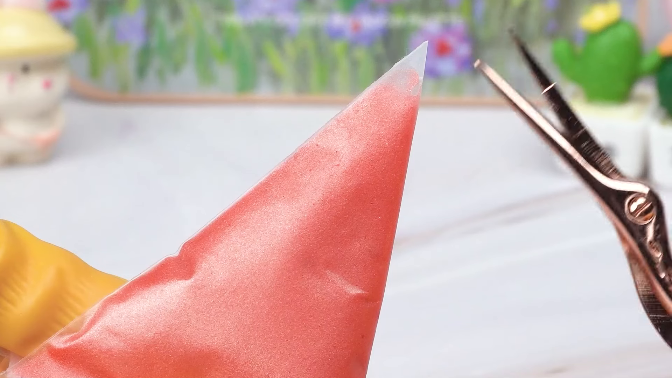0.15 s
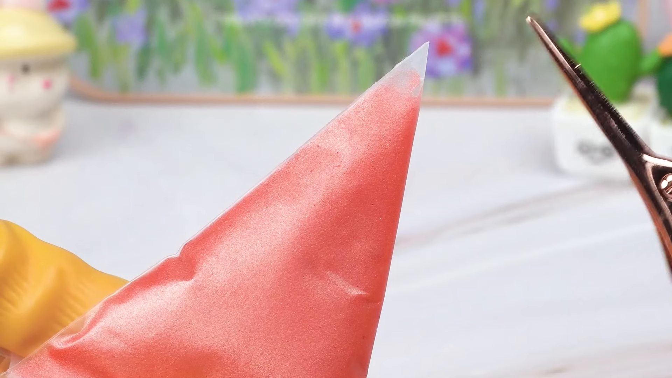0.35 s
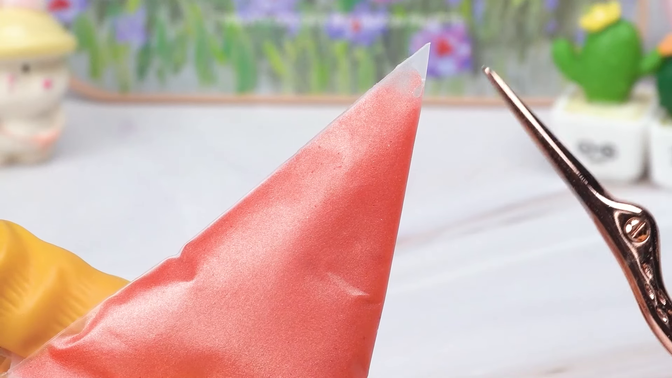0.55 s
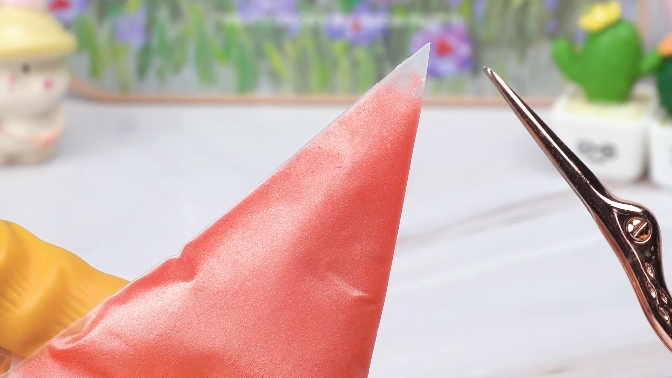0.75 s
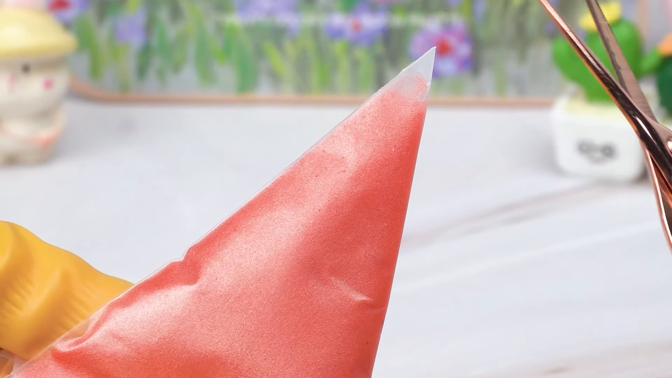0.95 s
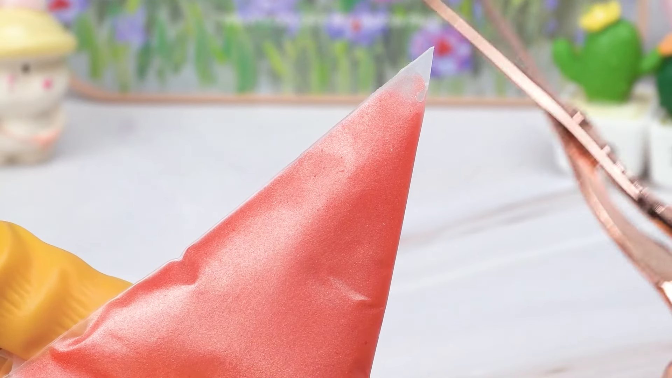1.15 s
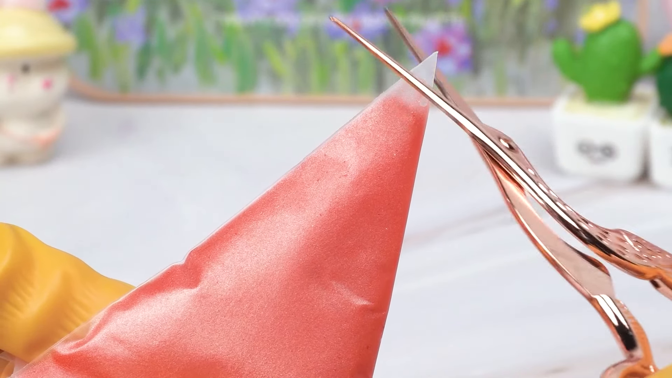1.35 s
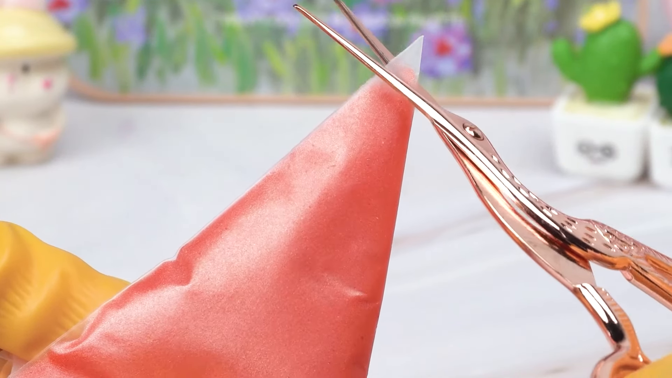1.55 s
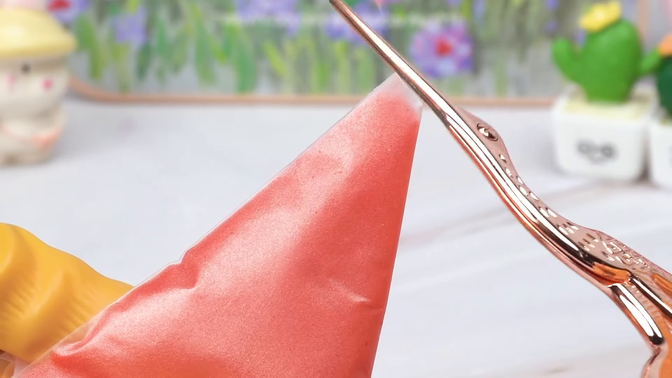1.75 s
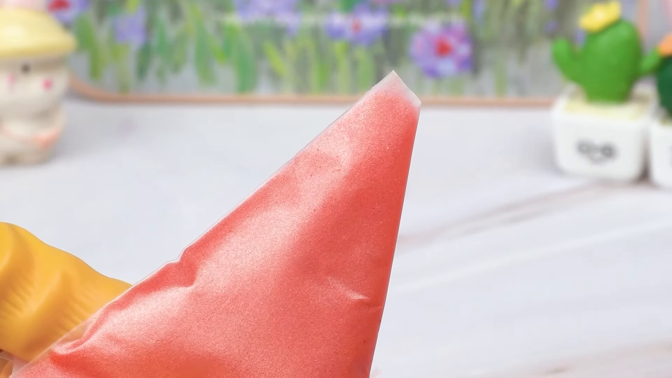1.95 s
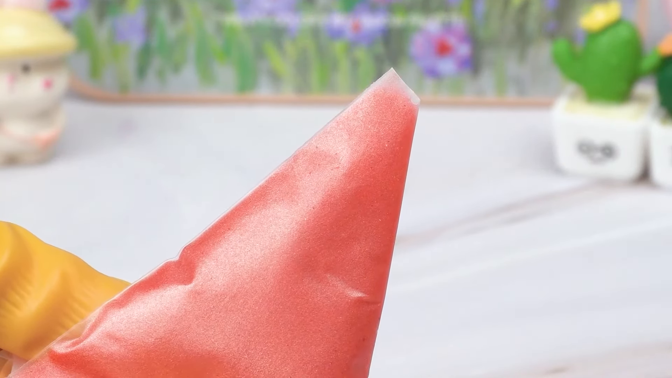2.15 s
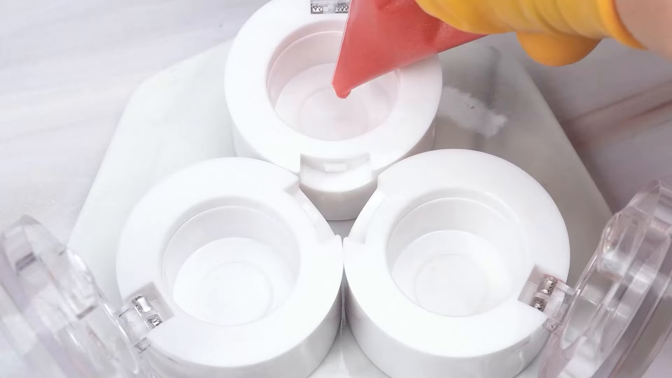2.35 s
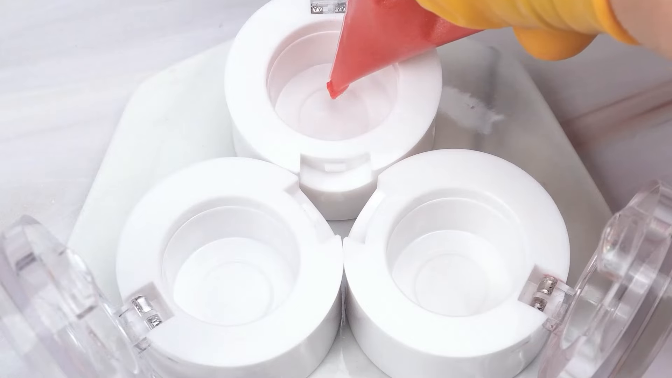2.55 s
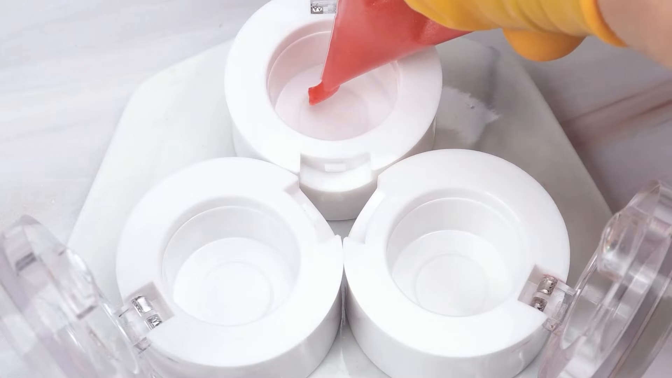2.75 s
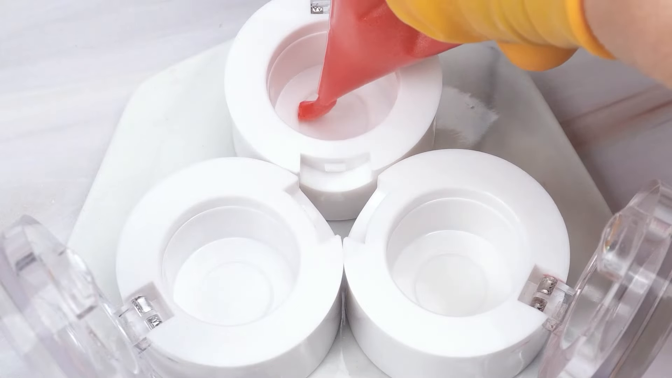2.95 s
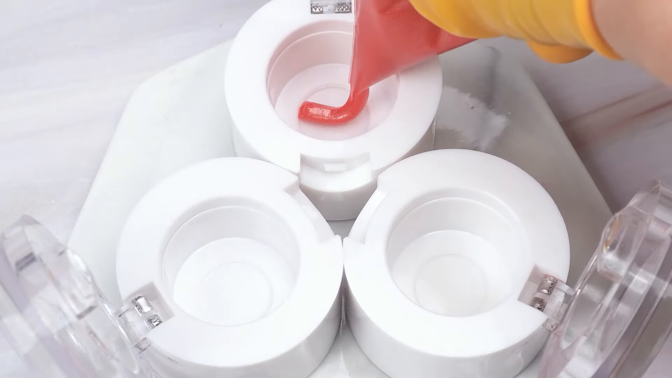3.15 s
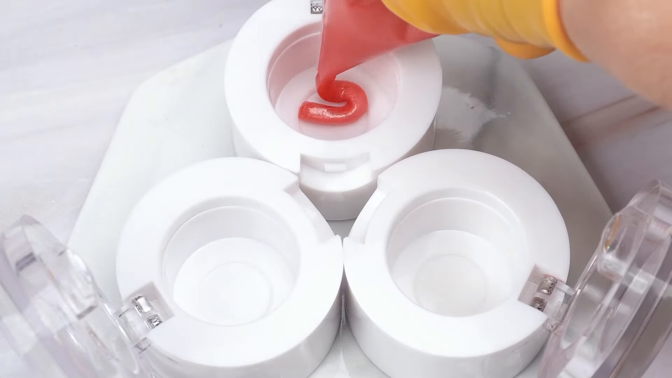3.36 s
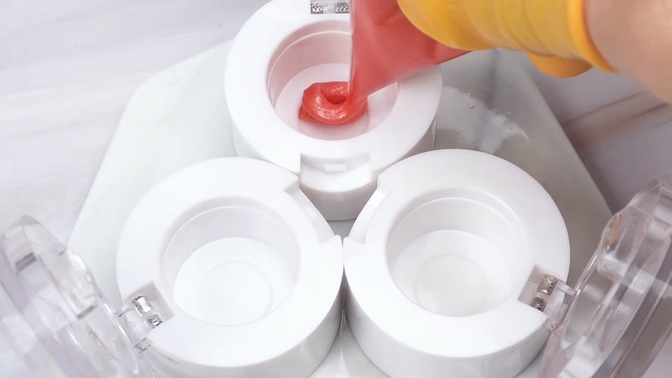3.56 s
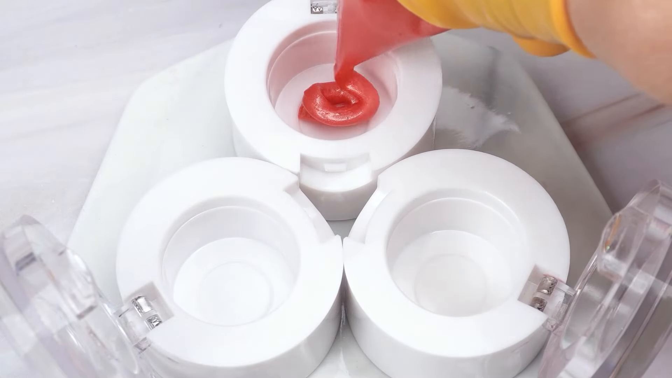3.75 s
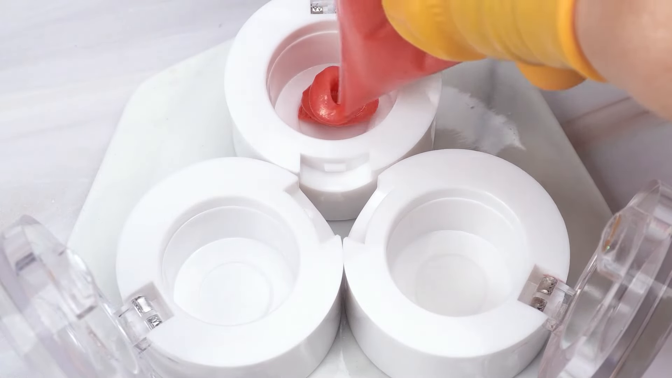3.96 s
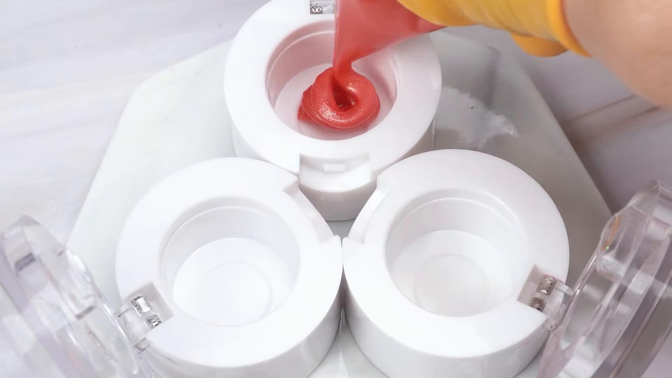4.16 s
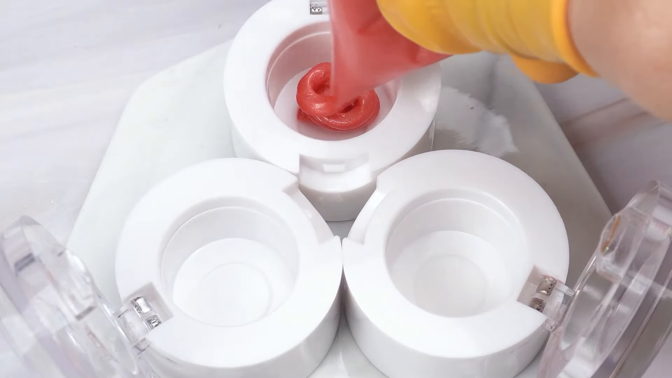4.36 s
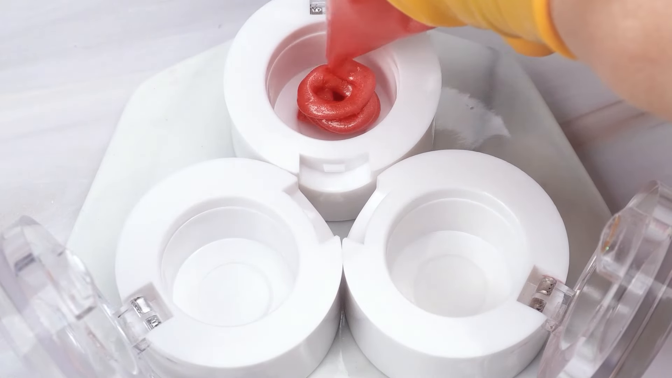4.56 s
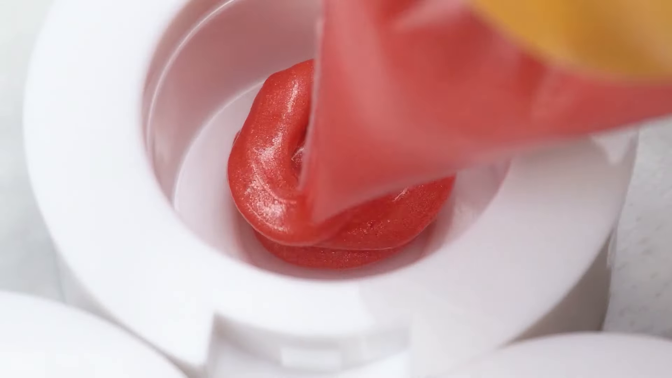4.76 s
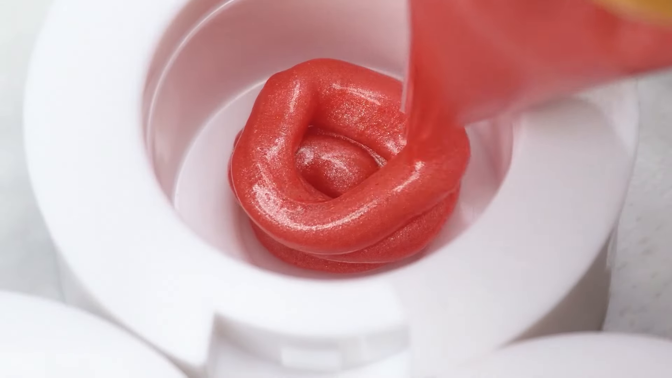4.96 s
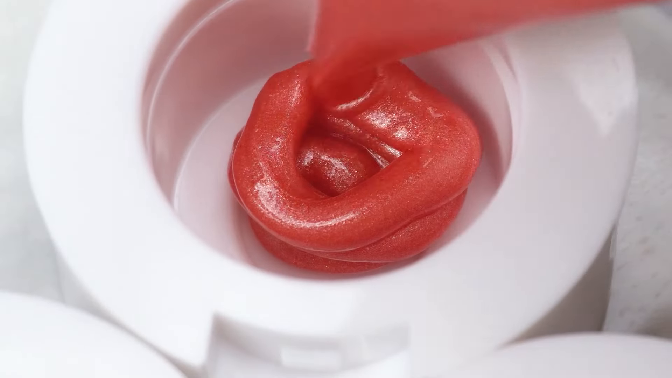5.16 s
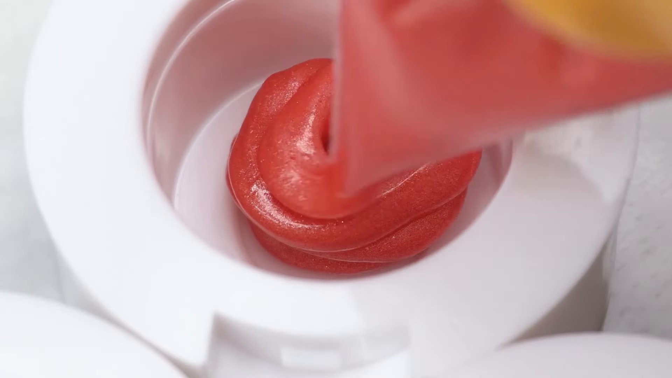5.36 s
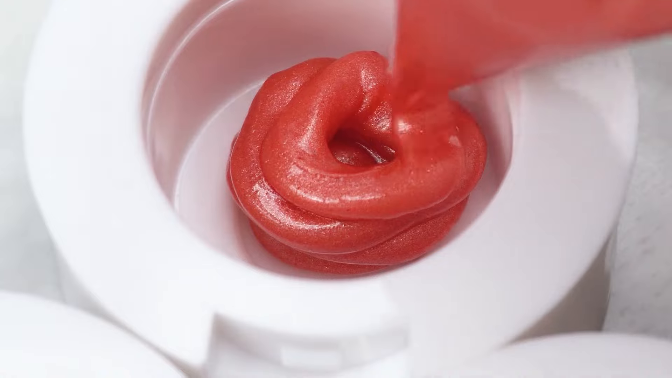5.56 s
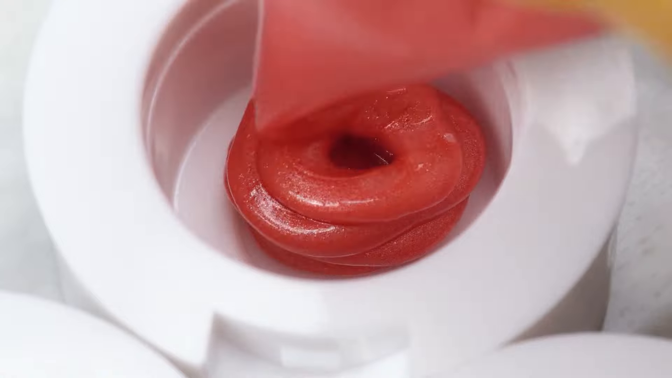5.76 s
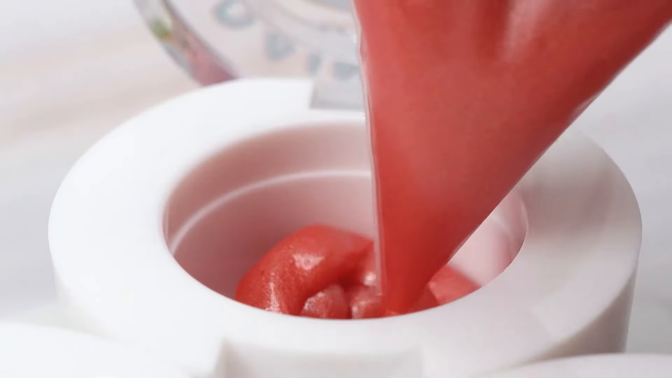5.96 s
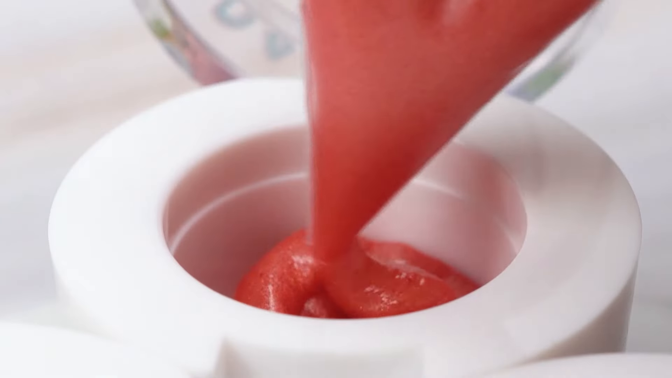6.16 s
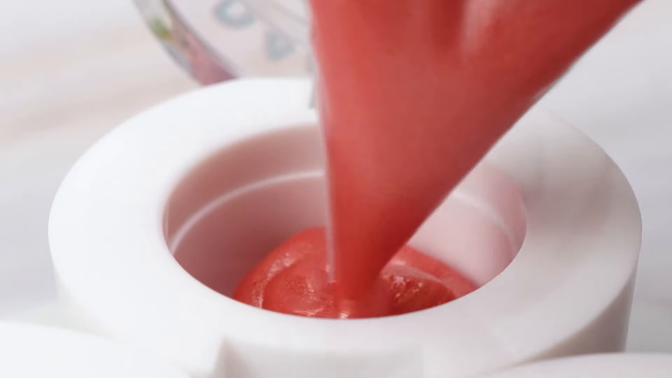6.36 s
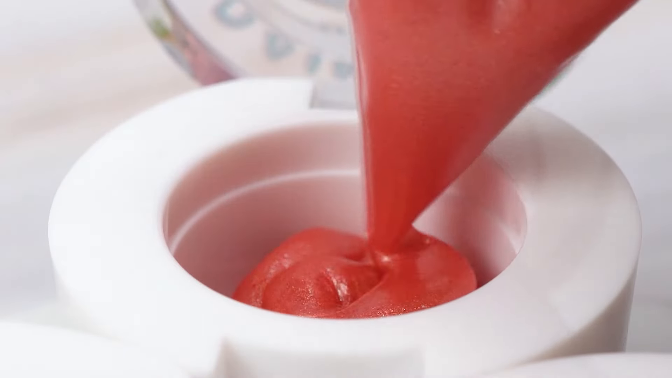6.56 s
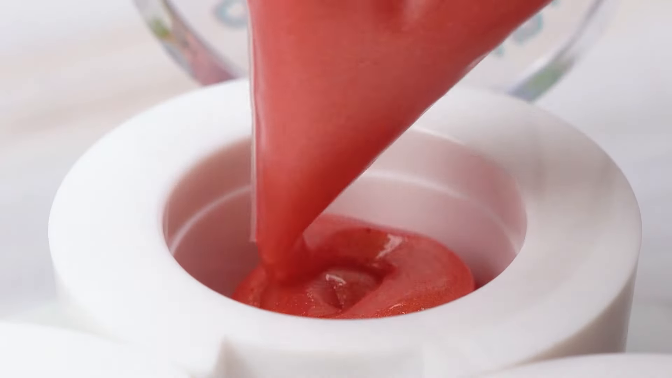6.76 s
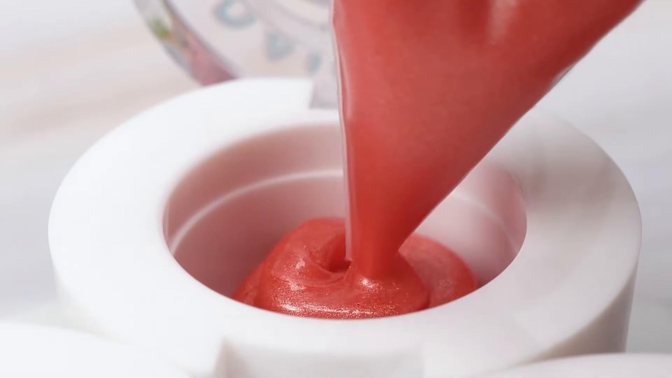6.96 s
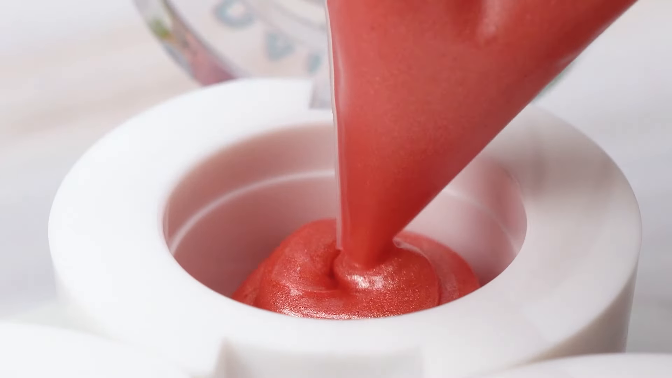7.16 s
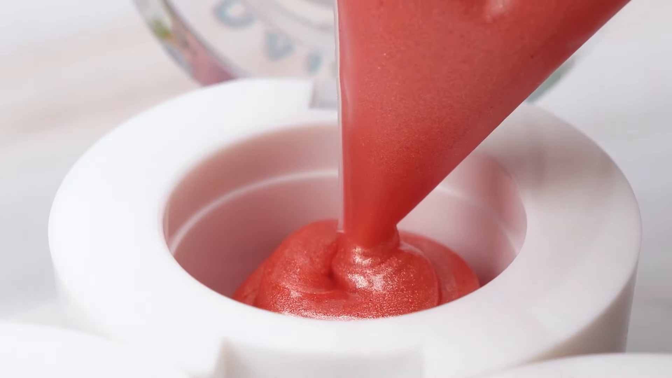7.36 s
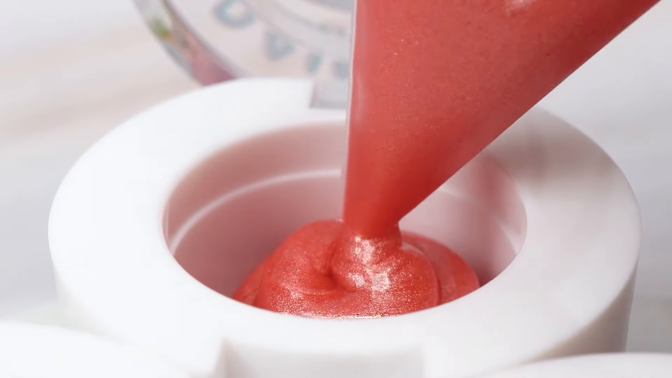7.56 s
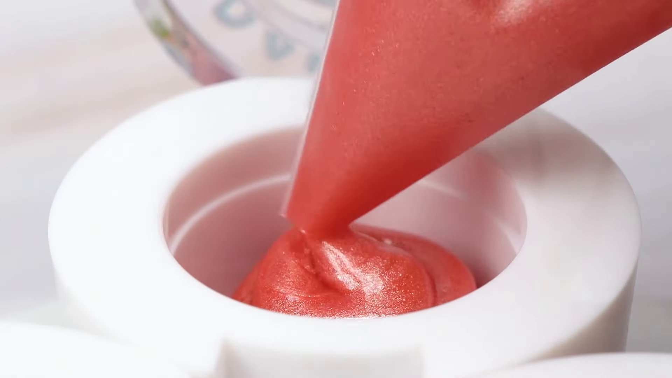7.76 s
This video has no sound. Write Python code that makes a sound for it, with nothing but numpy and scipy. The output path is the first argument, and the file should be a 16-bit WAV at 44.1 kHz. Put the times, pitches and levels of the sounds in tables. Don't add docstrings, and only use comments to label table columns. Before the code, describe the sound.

In a quiet room with faint hum and hiss, small steel scissors snap shut three times, bright and metallic. A faint high squeak follows, then a snip through plastic film, a closing snap, and a hard tick as the tip bounces on the table. After a pause, a filled plastic bag is squeezed, crackling densely, then more sparsely. Close stereo microphones hear the scissors wide and the bag centred.

```python
import sys
import numpy as np
from scipy import signal
from scipy.fft import rfft, irfft
from scipy.io import wavfile
from scipy.ndimage import uniform_filter1d

SR = 44100
rng = np.random.default_rng(int(sys.argv[2]) if len(sys.argv) > 2 else 0)


def dump(signal):
    limited = np.clip(np.atleast_2d(signal).T, -1, 1)
    pcm = np.round(limited * 32767).astype(np.int16)
    wavfile.write(sys.argv[1], SR, pcm)


def to_linear_factor(level_db):
    exponent = np.asarray(level_db, float) / 20
    return 10 ** exponent


N = 344421


def curve(rows, column=1, outside=None):
    rows = np.array(rows)
    return np.interp(np.arange(N) / SR, rows[:, 0], rows[:, column], outside, outside)


def unit(x):
    return x / np.sqrt(np.mean(x ** 2))


def band(x, lo_hz, hi_hz, order=2):
    sos = signal.butter(order, [lo_hz, min(hi_hz, .45 * SR)], "band", fs=SR, output="sos")
    return signal.sosfilt(sos, x)


def body(x, modes):
    out = 0
    for k, (hz, width_hz, db) in enumerate(modes):
        out = out + (-1) ** k * to_linear_factor(db) * signal.lfilter(*signal.iirpeak(hz, hz / width_hz, SR), x)
    return out


def bell(x, hz, q):
    b, a = signal.iirpeak(min(hz, .4 * SR), q, SR)
    return signal.lfilter(b, a, signal.lfilter(b, a, x))


def add(out, s, sound):
    i = int(s * SR)
    out[i:i + len(sound)] += sound[:N - i]


def echoes(x, t60, db, top_hz, gap=0.0022):
    t = np.arange(int(.25 * SR)) / SR
    tail = rng.standard_normal(len(t)) * to_linear_factor(-60 * t / t60) * (t > gap)
    tail = signal.lfilter(*signal.butter(1, top_hz, fs=SR), tail)
    return to_linear_factor(db) * signal.fftconvolve(x, tail / np.linalg.norm(tail))[:N]


# frequency in Hz, density in dB per Hz.
ROOM_COLOUR = [(25, -25), (53, -12), (70, -31.5), (94, -8.5), (134, -4.5), (190, -5.5), (293, -11.5),
               (344, -7.5), (591, -13), (775, -15), (1050, -17.5), (1750, -33.5), (16000, -38.5)]


def room_tone():
    hz, db = np.transpose(ROOM_COLOUR)
    colour = to_linear_factor(np.interp(np.log(np.fft.rfftfreq(N, 1 / SR) + 1), np.log(hz), db))
    return unit(irfft(rfft(rng.standard_normal(N)) * colour, N)) * to_linear_factor(-65)


# start in seconds, end in seconds.
WIDE_SPANS = [
    (-1, .8),
    (1.76, 2.19),
]


def room_width():
    side, t = room_tone(), np.arange(N) / SR
    side = to_linear_factor(-6.5) * side + 0.31 * band(side, 1250, 15200)
    is_wide = uniform_filter1d(1. * sum((t > start) & (t < end) for start, end in WIDE_SPANS), size=2000)
    side = side * is_wide + to_linear_factor(-18.5) * band(side, 4500, 13000)
    return side * np.array([[1], [-1]])


# time in seconds, level in dB.
HANDLING = [
    (2.4, -101),
    (3.42, -66.5),
    (6.51, -75.5),
    (6.63, -67),
    (7.81, -69),
]


def handling_rumble():
    return unit(band(rng.standard_normal(N), 11, 59.6)) * to_linear_factor(curve(HANDLING, outside=-200))


# time in seconds, pitch in Hz, level in dB.
SQUEAKS = [
    [(1.24, 13096, -76), (1.26, 13800, -88), (1.43, 12000, -92)],
    [(1.24, 11190, -97), (1.292, 11800, -79), (1.37, 11248, -88)],
]


def squeak():
    out = 0
    for rows in SQUEAKS:
        waver = unit(uniform_filter1d(rng.standard_normal(N), size=300))
        phase = 2 * np.pi * np.cumsum(curve(rows) + 30 * waver) / SR
        level_db = curve(rows, column=2, outside=-200) + 2.0 * waver
        out = out + np.sqrt(2) * to_linear_factor(level_db) * np.sin(phase)
    return out


RIGHT_LAG_S = .0025

# time in seconds, peak in dB.
BOUNCES = [
    (1.9727, -30),
    (2.0236, -49),
    (2.056, -48),
    (2.082, -60),
    (2.119, -57),
]
# frequency in Hz, width in Hz, level in dB.
TABLE_MODES = [(2240, 260, -1), (2730, 470, -2), (3160, 550, -4.5), (4680, 730, -9), (6600, 1060, -2),
               (10200, 4300, -5)]


def bounces():
    out, t = np.zeros((2, N)), np.arange(900) / SR
    for s, db in BOUNCES:
        near_top_hz = 13000 * to_linear_factor(0.36 * (db + 24.5))
        for side, lag_s, top_hz in ((0, 0.00017, near_top_hz), (1, RIGHT_LAG_S, 5500)):
            force = (t == 0) + 0.095 * rng.standard_normal(len(t)) * np.exp(-t / 0.0039)
            ring = band(body(force, TABLE_MODES), 1870, top_hz, order=3)
            add(out[side], s + 0.00087 + lag_s, ring / np.abs(ring).max() * to_linear_factor(db + 9.5))
    return out


# time in seconds, level in dB, scrape before the stop in dB,
# handle clack in dB, tip ring in dB.
SNAPS = [
    (0.0751, -18, 4.5, -9.5, 2),
    (0.3196, -19.5, -10.5, -10, 5),
    (0.5973, -21, -5, -10.5, 10.5),
    (1.821, -19, -9, -13.5, 6),
]
# frequency in Hz, width in Hz, level in dB.
BLADE_MODES = [(2200, 400, -12), (3120, 720, -14.5), (4600, 440, -15), (5010, 790, -12), (7050, 300, 2),
               (9800, 507, -6.5), (10740, 400, -3.5), (11600, 820, -5), (13500, 420, -2),
               (15500, 880, -1.5)]


def snaps():
    out, t = np.zeros((2, N)), np.arange(-240, 1600) / SR
    # side, lag s, scrape lead dB, rebound dB, tip facing dB; the tips point at the right one
    ears = (0, 0.00018, -15, -8, -5.5), (1, RIGHT_LAG_S, -5, -14, 4.5)
    for s, db, scrape_db, clack_db, tip_db in SNAPS:
        modes = []
        for hz, width_hz, mode_db in BLADE_MODES:
            grip_db = 2 * rng.standard_normal()
            modes.append((hz, width_hz, mode_db + grip_db + (clack_db + 11) * (hz < 6000)))
        for side, lag_s, lead_db, rebound_db, facing_db in ears:
            scrape = to_linear_factor(scrape_db + lead_db) * np.exp(np.minimum(t, 0) / .0025)
            stop = np.exp(-np.maximum(t, 0) / 0.00076)
            rebound = to_linear_factor(rebound_db) * np.exp(-((t - .004) / .0015) ** 2)
            chatter = to_linear_factor(-20) * (t > 0) * np.exp(-np.abs(t) / .007)
            force = np.where(t < 0, scrape, stop) + rebound + chatter
            push = force * rng.standard_normal(len(t)) + 7.2 * (t == 0)
            tip = (15100, 470, tip_db + facing_db)
            ring = unit(body(push, modes + [tip]))
            ring = ring + to_linear_factor(clack_db) * unit(band(push, 1330, 19700))
            pan_db = -5.5 * (.5 - side)
            add(out[side], s + lag_s + t[0], band(ring, 2050, 17000, order=6) * to_linear_factor(db - 13.5 + pan_db))
    return out


def scissors():
    steel = snaps() + bounces()
    steel = steel + np.array([echoes(channel, 0.12, -15.0, 3644, gap=0.00097) for channel in steel])
    return steel - 0.15 * steel[::-1]


# time in seconds, level in dB.
EFFORT = [
    [(1.46, -77), (1.572, -74), (1.582, -49.5), (1.632, -54.5), (1.655, -66.5), (1.7, -78)],
    [(2.48, -77), (2.7, -65.5), (2.8, -60.5), (3.1, -63), (3.22, -52.5), (3.28, -71), (3.4, -59), (3.8, -63), (3.95, -57.5), (4.05, -64.5), (4.39, -58), (4.45, -63), (4.6, -60), (4.78, -56.5), (4.98, -67.5), (5.15, -61.5), (5.28, -71), (6.62, -69.5)],
]
# time in seconds, rustle tilt in dB per octave, level over 10 kHz in dB.
FILM_TONE = [
    (1.4, 0, 4),
    (2.4, 8.5, -4),
    (3.0, -4, 6.5),
    (3.4, 0.5, 0.5),
    (5.0, 1, -0.5),
    (6.7, 0, -5),
]


def rustle(big, per_s=1300, spread_db=5.0):
    out, t = 0, np.arange(130) / SR
    level_db = np.maximum(*(curve(rows, outside=-200) for rows in EFFORT))
    for octave in np.arange(-2, 2.5):
        size_db = np.minimum(spread_db * rng.exponential(size=N), 8)
        ticks = (rng.random(N) < per_s / 5 / SR) * to_linear_factor(size_db)
        bursts = signal.fftconvolve(ticks, np.exp(-t / 0.00078))[:N] * rng.standard_normal(N)
        edges = 3000 * 2 ** (octave - .55), 3000 * 2 ** (octave + 0.5)
        rub = unit(band(rng.standard_normal(N), *edges))
        small = unit(band(bursts, *edges)) + to_linear_factor(-7.0) * rub
        keep = np.exp(-2 ** (.5 * octave) / (.005 * SR))
        power = np.abs(uniform_filter1d(band(big, *edges) ** 2, size=260))
        settle = np.sqrt(signal.lfilter([1 - keep], [1, -keep], power))
        effort = to_linear_factor(level_db - 11.0 + curve(FILM_TONE) * octave - 1.67 * abs(octave + .5))
        out = out + small * (effort + to_linear_factor(-13.5 - 0.5 * octave) * settle)
    return out


def tone_treble(bag):
    sos = signal.butter(4, 10000, "high", fs=SR, output="sos")
    return bag - (1 - to_linear_factor(curve(FILM_TONE, column=2))) * signal.sosfiltfilt(sos, bag)


# time in seconds,
# peak in dB, ring in Hz.
SMALL_CREASES = [(1.5309, -54, 4440), (1.5574, -52, 2490), (1.5886, -41, 5650), (1.629, -47, 4680),
                 (1.6674, -58, 4000), (2.522, -50, 9000), (2.64, -46, 9000), (2.812, -58, 7100),
                 (2.831, -37, 3260), (2.8377, -43, 6680), (2.8514, -39, 6080), (2.8633, -39, 2910),
                 (2.8987, -32.5, 6010), (2.911, -35, 3520), (2.942, -40, 5700), (2.975, -43, 9780),
                 (2.9946, -41, 6670), (3.0084, -41, 5180), (3.0234, -36, 5600), (3.0348, -36.5, 2950),
                 (3.0584, -47, 7040), (3.066, -44, 4390), (3.0785, -39, 7000), (3.0953, -41, 7680),
                 (3.1114, -45, 5270), (3.1267, -36, 9000), (3.1654, -40, 6200), (3.197, -57, 6500),
                 (3.2134, -30, 6500), (3.2293, -38, 5310), (3.263, -39, 2750), (3.3044, -43, 4470),
                 (3.3074, -43, 8500), (3.3164, -41, 2580), (3.33, -39, 9000), (3.3734, -42, 8000),
                 (3.4015, -44, 4450), (3.4785, -34, 7000), (3.4844, -37, 6400), (3.4953, -35, 6400),
                 (3.5148, -31.5, 3150), (3.5464, -38, 4200), (3.5714, -46, 7300), (3.5847, -46, 7340),
                 (3.5964, -45, 8000), (3.6084, -44, 5460), (3.654, -40, 9000), (3.7284, -36, 8300),
                 (3.7477, -37, 5740), (3.7655, -27.5, 7100), (3.7896, -47, 3070), (3.8407, -39, 8000),
                 (3.9627, -34, 6000), (3.989, -46, 11000), (4.061, -38, 6000), (4.0728, -37, 9500),
                 (4.0918, -44, 11000), (4.128, -42, 4820), (4.1322, -36, 4900), (4.169, -34, 4000),
               (4.1768, -38, 6500), (4.2226, -34.5, 3700), (4.2288, -42, 9000), (4.248, -44, 3700),
               (4.266, -32, 3600), (4.294, -33.5, 8530), (4.3165, -45, 7000), (4.327, -39, 7000),
               (4.3504, -41, 4300), (4.409, -36.5, 5170), (4.426, -44, 9490), (4.4603, -42, 8640),
               (4.4946, -37.5, 7240), (4.5038, -37.5, 8260), (4.5269, -38, 6340), (4.558, -39, 6000),
               (4.7162, -33.5, 9000), (4.7395, -33, 4270), (4.7553, -39, 6500), (4.8004, -48, 3060),
               (4.8273, -34, 6840), (4.8553, -37, 4290), (4.8796, -38, 5460), (4.9436, -44, 8500),
               (4.991, -47, 7300), (5.0044, -56, 3310), (5.0384, -49, 2580), (5.0874, -47, 3500),
               (5.1335, -43, 2590), (5.1484, -47, 5000), (5.171, -44, 3500), (5.211, -46, 2910),
               (5.2292, -40, 5000), (5.2484, -41.5, 8440), (5.4088, -43, 6940), (5.5532, -48, 2620),
               (5.9909, -43, 9000), (6.0154, -55, 7780), (6.0813, -42, 9600), (6.1044, -46, 8610),
               (6.1124, -48, 4730), (6.1947, -44, 10970), (6.3018, -45, 9850), (6.4044, -48, 3700),
               (6.4674, -54, 11000), (6.5, -52, 3860), (6.553, -48, 3200), (5.3085, -47, 1300),
               (3.3259, -36, 900), (3.4937, -31, 1200)]
# time in seconds, peak in dB, ring in Hz.
FOLDS = [(1.575, -48, 670), (1.586, -42, 614), (1.597, -45, 805), (2.83, -44.5, 598), (2.861, -39, 1880),
         (2.875, -42, 748), (2.897, -40, 860), (2.926, -40.5, 656), (2.942, -49, 716), (3.016, -45, 990),
         (3.094, -39.5, 1900), (3.151, -46, 587), (3.172, -33.5, 844), (3.188, -47, 781),
         (3.226, -34.5, 760), (3.316, -38, 2320), (3.373, -45, 1650), (3.515, -39, 1870),
         (3.614, -37, 1670), (3.688, -37, 2110), (3.704, -41, 1880), (3.716, -45, 950), (3.789, -34, 1210),
         (3.843, -43, 1350), (3.951, -40.5, 1120), (4.098, -40, 1530), (4.133, -36, 1510),
         (4.177, -40, 1510), (4.234, -41, 907), (4.264, -38, 1220), (4.376, -33, 2210), (4.563, -37, 1260),
         (4.69, -35, 2130), (4.769, -49, 1670), (4.967, -50, 940), (5.087, -41, 1860), (5.17, -45, 1060),
         (5.3705, -46, 3600), (5.5, -37, 1510), (5.566, -43, 1240), (5.964, -45, 1550), (6.118, -45, 1860),
         (6.133, -47, 2340), (6.143, -46, 1450), (6.28, -40, 1620), (6.416, -45, 1850), (6.44, -47, 1170),
         (6.522, -42.5, 1710)]


def lesser_creases():
    small = SMALL_CREASES
    crack_db = 2 + 9.3 * (rng.random(len(small)) - .5)
    return [(*row, db) for row, db in zip(small, crack_db)] + [(*row, -3) for row in FOLDS]


# time in
# seconds, peak in dB, ring in Hz, crack against ring in dB.
CUT = [
    (1.5834, -48, 4400, 8),
    (1.5954, -38, 6200, -5),
    (1.5994, -51, 3000, 5),
    (1.6033, -38, 7440, -10),
    (1.6113, -29.5, 12800, 11),
    (1.6185, -41, 10490, 16),
]
SQUEEZE = [(2.5629, -41.5, 8350, -6), (2.7204, -38.5, 4370, -1), (2.7562, -35, 7950, 5),
           (2.8183, -33, 13800, 7), (2.8273, -30.5, 9300, 3), (2.8428, -40, 7130, 8), (2.8742, -32, 9300, 5),
           (2.883, -39, 4860, -3), (2.895, -35, 9100, 6), (2.9077, -36, 6070, 1), (2.9253, -31, 7710, 8),
           (2.9335, -30, 3070, 8), (2.9557, -37, 10000, -3), (2.967, -36, 10010, 13), (3, -30.5, 6540, 8),
           (3.0156, -35, 7340, 12), (3.0282, -35, 12770, 4), (3.047, -34, 8050, 8), (3.083, -35.5, 7000, 8),
           (3.117, -30.5, 5380, 9), (3.1416, -35.5, 3540, -15), (3.1493, -26, 8000, 12),
           (3.1583, -33, 9900, -10), (3.1711, -25, 6050, 6), (3.1794, -32, 876, -22),
           (3.2052, -26.5, 4000, -1), (3.1803, -33, 980, -4), (3.217, -28.5, 3300, -4),
           (3.2236, -32.5, 9600, -2.5), (3.2358, -35, 5970, -11.5)]
FIRST_COILS = [(3.2901, -27.5, 6750, 1), (3.3254, -26, 2240, 0.5), (3.349, -32, 2000, 8),
               (3.3613, -30.5, 1500, -22), (3.4142, -30, 1550, -22), (3.4171, -34, 4700, -9),
               (3.461, -32.5, 7400, -12), (3.4742, -32, 3320, -12), (3.4926, -27, 2170, 7.5),
               (3.505, -24.5, 6700, -20), (3.7549, -35, 388, -26), (3.5384, -31, 3440, 0),
               (3.615, -31.5, 3730, 11), (3.62, -32, 6060, 6), (4.006, -42, 7000, 0),
               (3.6647, -28, 3130, -7), (3.6683, -30, 1820, -10), (3.69, -31, 3600, 1),
               (3.704, -31, 8500, -6), (3.7188, -33.5, 2100, -5), (3.755, -18, 1330, -1),
               (3.7557, -23.5, 5640, -13), (3.7623, -28, 950, -8), (3.819, -28, 4220, -7),
               (3.857, -28.5, 3370, -2), (3.867, -30.5, 2930, -5), (3.916, -35.5, 9000, 2),
               (3.938, -31, 5380, -22), (3.953, -33.5, 3240, -2), (3.9786, -33, 4000, -7),
               (4.0087, -20, 6800, -4), (4.03, -31.5, 11600, 18)]
NEXT_COILS = [(4.0962, -33.5, 7640, -19), (4.1373, -26.5, 4700, 12), (4.1421, -35, 1480, -22),
              (4.1716, -34, 1150, 4), (4.197, -29.5, 2700, -2.5), (4.2064, -33.5, 5530, 8),
              (4.263, -23.5, 6740, 10), (4.2791, -22.5, 1210, 7.5), (4.3349, -28, 1860, 4.5),
              (4.3392, -30.5, 8600, -2), (4.3697, -47, 5000, -2), (4.601, -42, 4400, -9),
              (4.7, -38, 8050, 2), (4.377, -36, 4530, -9), (4.3862, -24.5, 2400, 8), (4.3892, -27, 2270, 2),
              (4.397, -27, 2400, -11), (4.3993, -27.5, 2200, -2), (4.5167, -35, 9100, -7),
              (4.5485, -23.5, 6800, 6.5), (4.6066, -21.5, 4960, 8), (4.6047, -28, 4260, 8),
              (4.634, -27, 5850, 4.5), (4.667, -27, 6150, 2), (4.6898, -26.5, 2920, -5),
              (4.693, -41, 2140, -24), (4.731, -30, 6600, 4), (4.734, -31, 1900, -2),
              (4.7857, -26.5, 5270, -10.5), (4.7907, -26.5, 1530, -9), (4.8182, -22.5, 3770, -1),
              (4.84, -29, 6940, 8), (4.8637, -30, 3800, 1)]
SLOW_COIL = [(4.9214, -39, 8000, -2), (5.0703, -32.5, 9300, 6), (5.119, -29.5, 1690, 4),
             (5.1992, -38.5, 2870, -4), (5.2032, -31.5, 1800, -5.5), (5.219, -43, 8000, -10),
             (5.2346, -33, 3300, 17), (5.3045, -35.5, 4830, -10), (5.3066, -30, 2650, -6.5),
             (5.313, -41, 7200, 15), (5.3198, -46, 8350, 9), (5.335, -40.5, 8750, -23),
             (5.363, -33, 2080, 2), (5.186, -38, 2560, 10), (5.4104, -36, 980, -7.5),
             (5.4304, -41, 12380, 10), (5.4565, -47, 3500, -6), (5.472, -37.5, 4530, -4),
             (5.497, -41.5, 2730, -35), (5.5032, -33, 2670, -6), (5.519, -44, 7000, -1),
             (5.5584, -32.5, 1860, -6), (5.563, -34, 1180, 3.5), (5.6169, -27, 1640, 1),
             (5.6237, -32.5, 3870, 8), (5.63, -42.5, 7300, -20), (5.6402, -32.5, 3040, 14),
             (5.645, -39, 3160, 8), (5.6598, -41.5, 8400, -5)]
LAST_COIL = [(5.9697, -33.5, 1600, -3.5), (5.978, -38.5, 7400, 8), (5.986, -42.5, 1790, -5),
             (5.9964, -37.5, 5460, 9), (6.0277, -44.5, 7900, 2), (6.0591, -41, 3600, 11),
             (6.0972, -35.5, 8960, -6), (6.161, -44, 11000, -1), (6.5295, -48, 8500, -3),
             (6.1651, -37, 3200, -12), (6.1762, -40.5, 5700, 8), (6.2276, -37, 4300, -6),
             (6.2417, -35.5, 5470, -12), (6.249, -33.5, 1700, -2.5), (6.2535, -40, 7170, 8),
             (6.281, -29.5, 4600, 0.5), (6.351, -37, 4230, -15), (6.3832, -34.5, 1950, -9.5),
             (6.393, -38, 3800, -23), (6.4288, -44, 7900, 8), (6.4411, -27, 3240, -36),
             (6.4588, -30, 5070, 18), (6.4857, -40.5, 8100, 8), (6.513, -42.5, 3740, -1),
             (6.5385, -34.5, 6240, -22), (6.549, -37.5, 3130, 4), (6.567, -44, 8800, 4),
             (6.607, -36.5, 4670, 12)]


def creases():
    out, t = np.zeros(N), np.arange(900) / SR
    clear = [*CUT, *SQUEEZE, *FIRST_COILS, *NEXT_COILS, *SLOW_COIL, *LAST_COIL]
    for s, db, hz, crack_db in [*clear, *lesser_creases()]:
        noise, chance = rng.standard_normal((3, len(t))), rng.random(4)
        share = to_linear_factor(min(crack_db, 8) - 1.9)
        soft = np.clip(-.07 * crack_db, 0, 1.2)
        decay = np.exp(-t * (hz + 900) / (1.7 + 1.7 * soft))
        shape = decay * (1 - np.exp(-t * hz / (.25 + 1.2 * soft ** 2)))
        second_hz = hz * (0.63 + 0.884 * chance[0])
        third_hz = min(hz * (1.49 + chance[2]), .4 * SR)
        ring = np.sin(2 * np.pi * hz * t) + 0.32 * np.sin(2 * np.pi * second_hz * t)
        ring = shape * (ring + 0.22 * np.sin(2 * np.pi * third_hz * t))
        crack = bell((t == 0) + .4 * noise[0] * np.exp(-t / .0005), hz ** .6 * 30, .85)
        shiver = unit(bell(noise[1], hz * 0.99, 2.13)) * np.exp(-t / (0.0011 + 0.0012 * chance[2]))
        shiver = shiver * (1 - np.exp(-t / 0.00053))
        shiver_db = -7.5 + 7.3 * chance[3] - 0.4 * max(crack_db, 0)
        thud = unit(bell(noise[2], 500 + 0.19 * hz, 0.84)) * np.exp(-t / 0.002) * chance[1]
        pop = ring / np.abs(ring).max() + share * crack / np.abs(crack).max()
        pop = pop + to_linear_factor(shiver_db) * shiver + to_linear_factor(-11.5) * thud
        pop = band(pop, min(0.63 * hz, 750), 19000)
        add(out, s, pop / np.sqrt(1 + share ** 2) * to_linear_factor(db - 2.5))
    return out


# start in seconds, end in seconds, how far back it is taken from in seconds, gain in dB.
REPLAYS = [
    (5.70, 5.965, .4109, 0),
    (6.615, 7.81, 1.3182, 6),
]


def piping_bag():
    bag = creases()
    bag = bag + rustle(bag)
    bag = bag + echoes(band(bag, 460, 4900), 0.031, -19.0, 3300)
    bag = tone_treble(bag)
    for start, end, back, db in REPLAYS:
        i, j, lag = int(start * SR), min(int(end * SR), N), round(back * SR)
        bag[i:j] = to_linear_factor(db) * bag[i - lag:j - lag]
    return bag


def scene():
    centre = piping_bag() + squeak() + handling_rumble() + room_tone()
    return scissors() + centre + room_width()


# time in seconds, level in dB the band over 13 kHz must reach to be kept.
TOP_KEPT_DB = [(1.95, -97), (1.96, -72), (2.13, -76), (2.14, -97), (2.68, -97), (2.7, -81), (4.85, -74),
               (4.9, -76), (6.6, -76), (6.62, -70)]


def gate_treble(x):
    size = 288
    block = np.arange(N) // size
    mood = to_linear_factor(5.0 * rng.standard_normal(block[-1] + 1))
    for edge_hz, harder_db in ((12900, 0), (15100, -1), (15850, 11)):
        top = signal.sosfiltfilt(signal.ellip(8, .05, 50, edge_hz, "high", fs=SR, output="sos"), x)
        power = (np.bincount(block, np.mean(top, axis=0) ** 2) / size * mood)[block]
        need_db = curve(TOP_KEPT_DB) + harder_db
        is_quiet = uniform_filter1d(1. * (power < to_linear_factor(2 * need_db)), size=192)
        x = x - is_quiet * top
    return x


def roll_off(x):
    return signal.sosfilt(signal.butter(12, 17660, fs=SR, output="sos"), x)


def record(dry):
    limited = signal.sosfiltfilt(signal.ellip(8, .2, 60, 16600, fs=SR, output="sos"), dry)
    mix = gate_treble(limited)
    return roll_off(mix)


dry = scene()
out = record(dry)
dump(out)
```